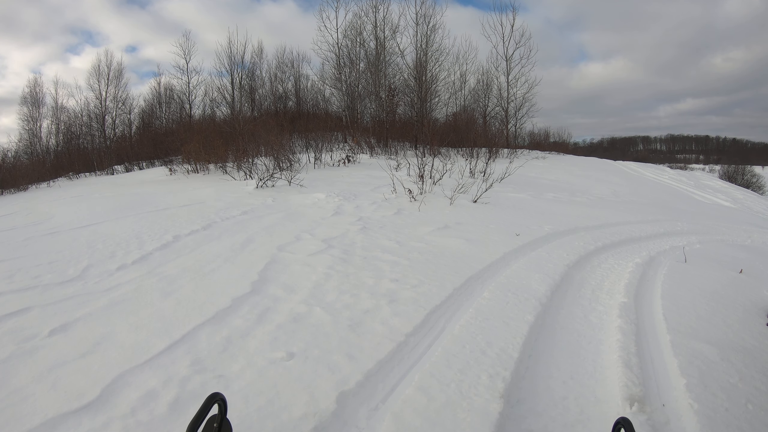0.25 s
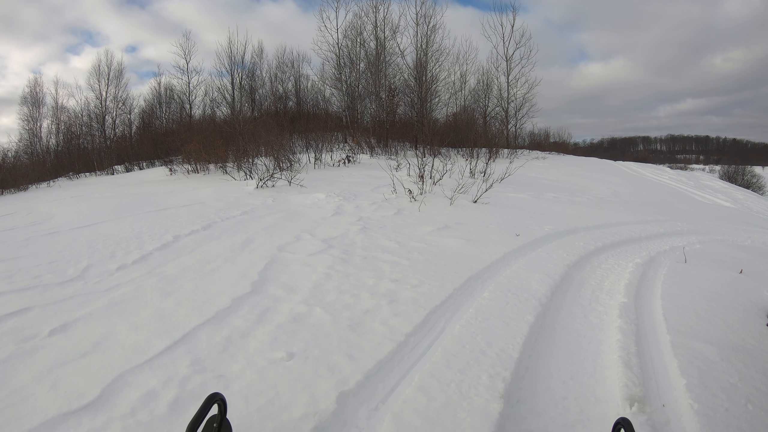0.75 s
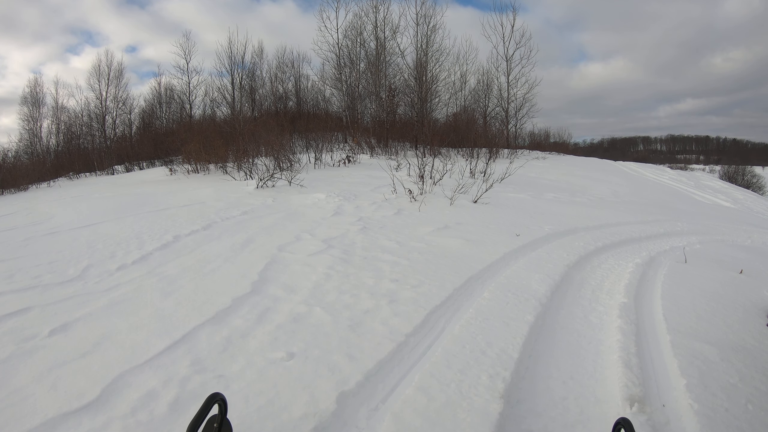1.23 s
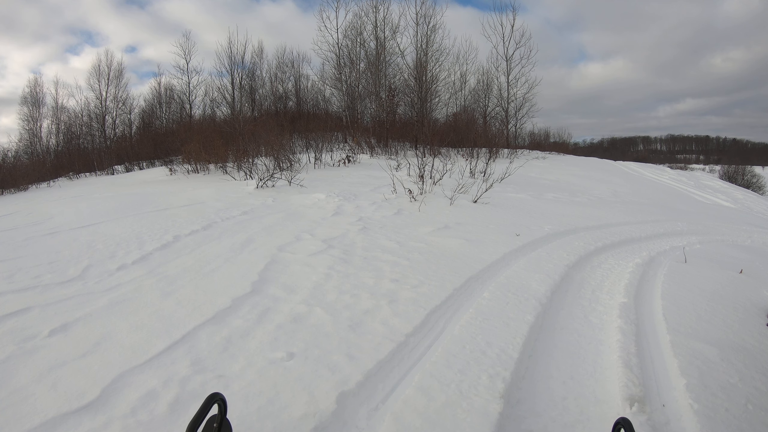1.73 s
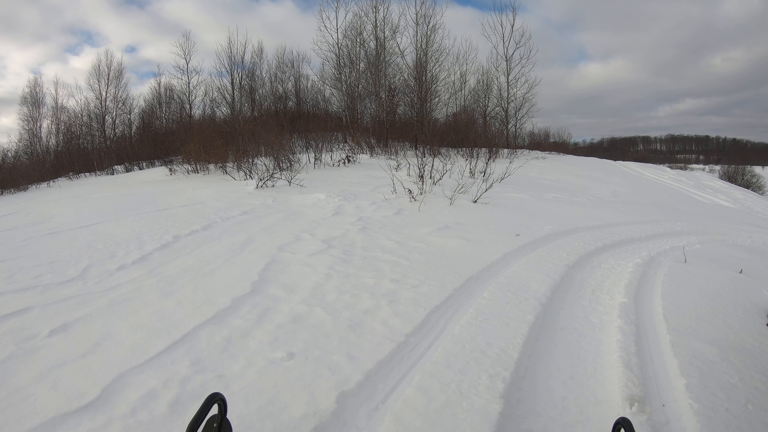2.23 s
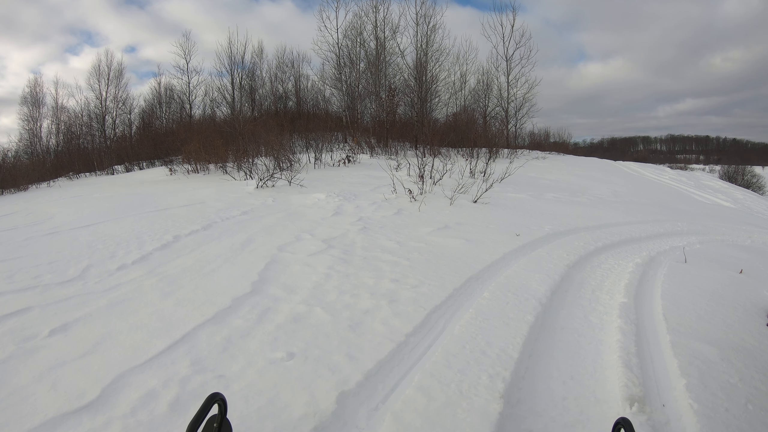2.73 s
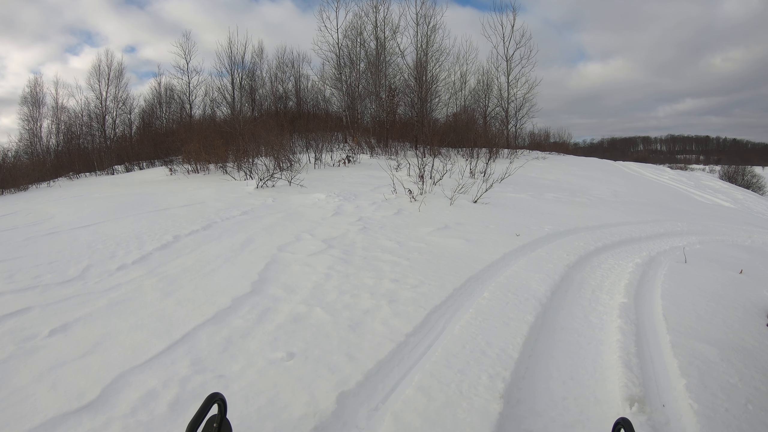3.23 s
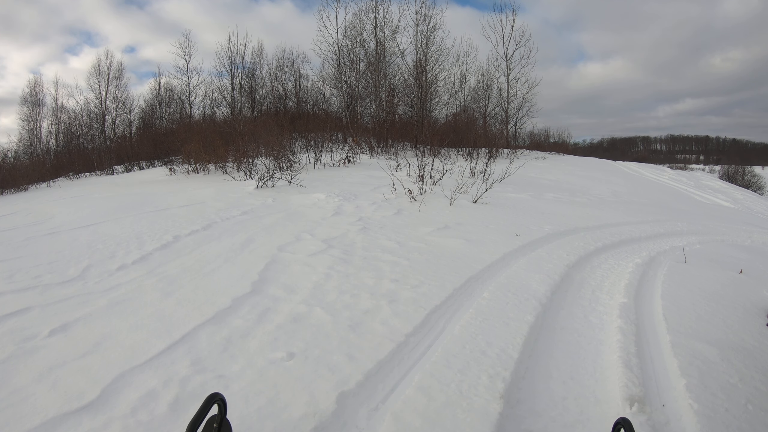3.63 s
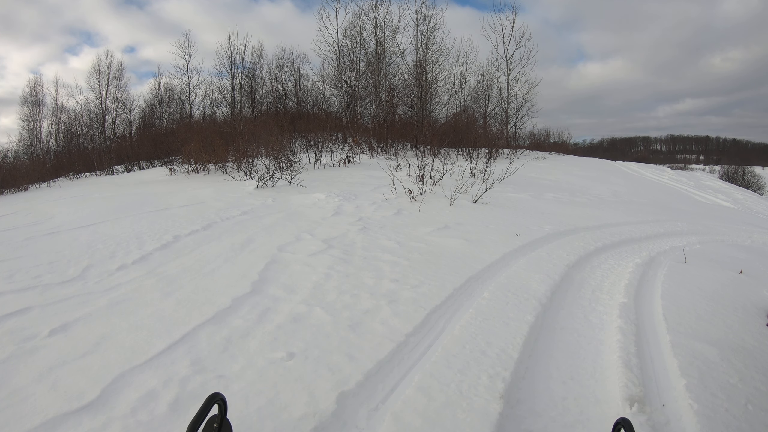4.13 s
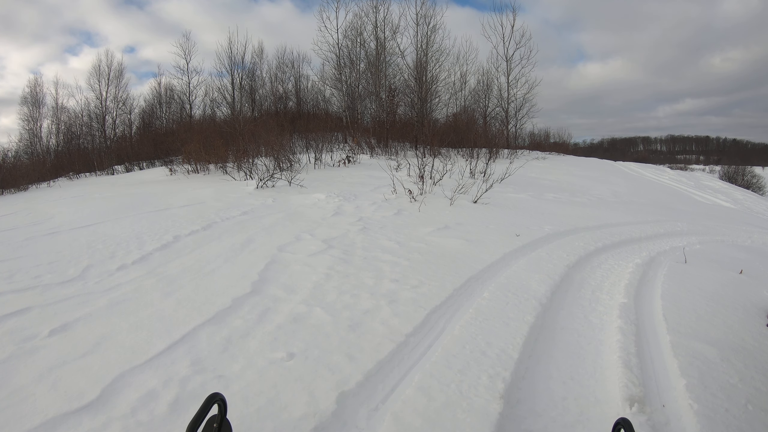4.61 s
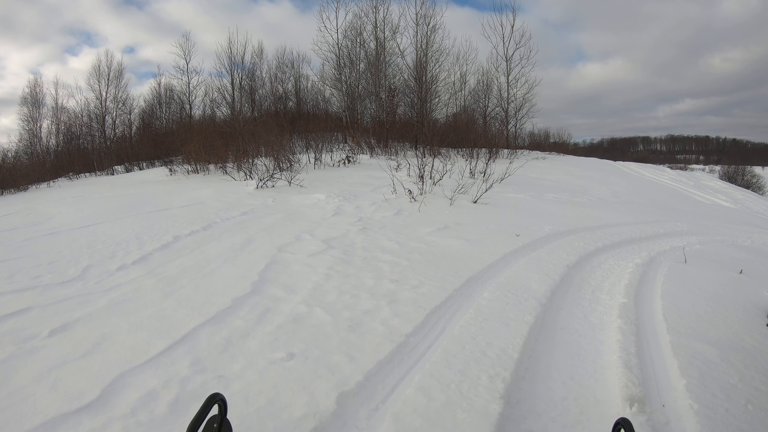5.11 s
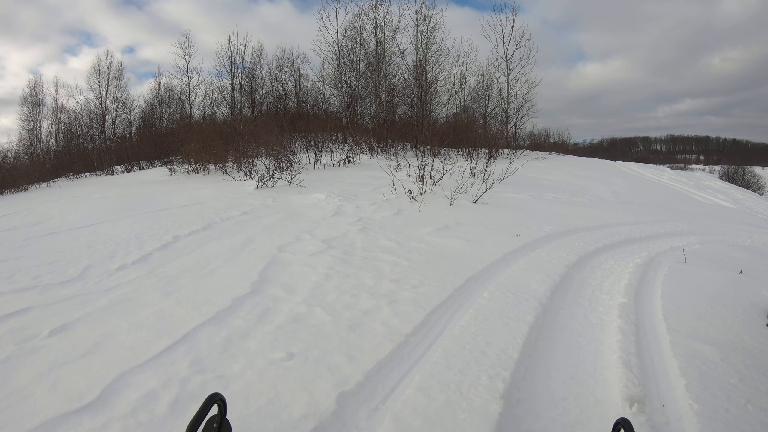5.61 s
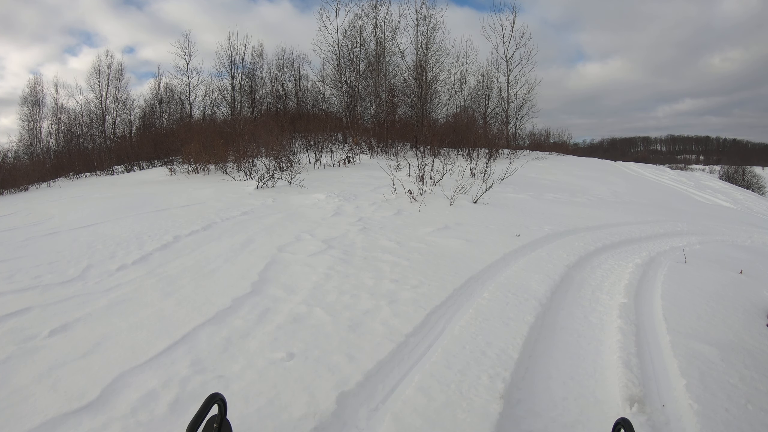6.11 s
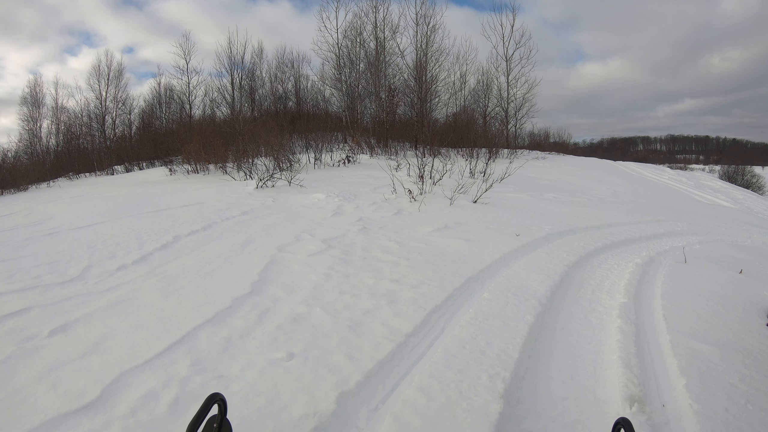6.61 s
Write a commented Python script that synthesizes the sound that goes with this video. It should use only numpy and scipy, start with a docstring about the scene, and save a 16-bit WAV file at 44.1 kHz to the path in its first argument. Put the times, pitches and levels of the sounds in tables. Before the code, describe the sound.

A two-stroke snowmobile engine idles steadily up close, a low fluttering putter with uneven thumps and constant loose metallic clanking and rattling outdoors.

```python
"""A two-stroke twin idles on a parked snowmobile in open snow, heard by a small camera's microphone on it.
Early in each crank turn a thin part ticks (noise bursts) and puffs ring the silencer (resonators); then
the first cylinder gulps (pressure dips), the second half a turn later. Uneven burns thump the pipe (resonators)
about .09 turn after each half-turn mark, and loose metal slaps, clanks and knocks (struck modes).
Gas roars all through (coloured noise swelling with the crank). The snow gives back no echo."""
import sys
import numpy as np
from scipy import signal
from scipy.fft import rfft, irfft
from scipy.io import wavfile
from scipy.ndimage import uniform_filter1d

SR = 44100
rng = np.random.default_rng(int(sys.argv[2]) if len(sys.argv) > 2 else 0)


def store_wav(level_fs):
    """Save 16-bit WAV to argv[1]."""
    pcm = np.round(np.clip(np.atleast_2d(level_fs), -1, 1) * 32767)
    wavfile.write(sys.argv[1], SR, pcm.T.astype(np.int16))


def natural_amplitude(level_db):
    """Convert a level in decibels to a linear amplitude factor, elementwise."""
    exponent = np.asarray(level_db, float) / 20
    return 10 ** exponent


N = 302570


def band(x, hz, width):
    """Two-pole resonance, gain 1 at the centre."""
    return signal.lfilter(*signal.iirpeak(hz, hz / width, fs=SR), x)


def level(x, db):
    """Scale to an rms level."""
    return x * natural_amplitude(db) / np.sqrt(np.mean(x ** 2))


def drift(hold):
    """Slow random wander: noise held for a number of samples, then smoothed over as many."""
    held = rng.standard_normal(N // hold + 1).repeat(hold)
    return uniform_filter1d(held, size=hold)[:N]


def blows(angle, at_turns, size):
    """One impulse of the given size where the crank (or the clock) passes each angle (or time)."""
    out = np.zeros(N + 1)
    np.add.at(out, np.searchsorted(angle, at_turns), size)
    out[0] = 0  # blows from before the start all land here
    return out[:N]


def bursts(impulses, fade_s):
    """Every impulse becomes a short fading burst of noise."""
    fade = signal.lfilter([1], [1, -np.exp(-1 / (fade_s * SR))], impulses)
    return fade * rng.standard_normal(N)


# idle speed hunts a little: (time [s], speed [crank turns/s])
IDLE_SPEED = [(0, 32.349), (.69, 32.459), (1.34, 32.897), (1.48, 32.355), (2.16, 33.023), (3.13, 32.666),
              (3.29, 32.314), (4.07, 33.292), (4.29, 32.541), (4.99, 32.407), (5.54, 33.099),
              (5.72, 32.634), (6.86, 31.766)]
START_ANGLE_TURNS = -.087
# the crank runs unevenly: scale of the wander before smoothing, and changes a second
UNEVEN_TURNS, UNEVEN_PER_S = .008, 16


def crank():
    """Crank angle in turns at every sample: the running sum of the speed, plus a random wander."""
    speed = np.interp(np.arange(N) / SR, *np.transpose(IDLE_SPEED))
    uneven = drift(int(SR / UNEVEN_PER_S))
    return START_ANGLE_TURNS + np.cumsum(speed) / SR + UNEVEN_TURNS * uneven


# pressure dips that follow each other in every half turn: (crank angle [turns], width [turns],
# depth [dB], second cylinder late by [turns], second cylinder deeper by [dB])
GULPS = [(0.2, 0.036, -4.7, 0, 0.3), (0.294, 0.038, -19, 0.0052, -2.5), (0.41, 0.028, -10.5, 0.016, 1.2)]
GULP_SCATTER_TURNS, GULP_SCATTER_DB = 0.0049, 1.0


def gulps(angle):
    """Smooth pressure dips, two sets a turn, each a little early or late and deep or shallow."""
    out = np.zeros(N)
    halves = int(2 * angle[-1]) + 2
    for at, width, db, late, second_db in GULPS:
        half = np.floor(2 * (angle - at) + .5)
        chance = rng.standard_normal((halves, 2))[np.clip(half, 0, None).astype(int)]
        second = half % 2
        centre = at + half / 2 + late * second + GULP_SCATTER_TURNS * chance[:, 0]
        depth = natural_amplitude(db + second_db * second + GULP_SCATTER_DB * chance[:, 1])
        out -= depth * np.exp(-.5 * ((angle - centre) / width) ** 2)
    return out - out.mean()


# resonances of the exhaust pipe: (frequency [Hz], width [Hz], rms level [dB])
PIPE = [(110.6, 49.7, -22), (265.5, 36, -37), (367.8, 43, -34)]
# the strongest burns: (time [s], strength before the mean is taken off [relative])
FULL_BURNS = [(.237, 1.6), (.453, 1.5), (.469, 2.0), (.577, 1.6), (1.007, 2.2), (1.053, 1.6), (1.19, 1.9),
              (1.573, 1.8), (1.681, 1.7), (1.956, 1.9), (2.898, 1.8), (3.235, 1.6), (3.359, 2.2),
              (3.405, 1.6), (3.421, 1.6), (3.62, 1.8), (3.727, 1.6), (3.818, 1.8), (3.863, 1.6),
              (3.999, 1.6), (4.241, 1.9), (4.333, 1.8), (4.348, 1.5), (4.425, 1.6), (4.579, 1.8),
              (4.918, 1.8), (4.933, 1.6), (5.042, 2.1), (5.348, 1.9), (5.424, 1.5), (5.651, 1.8),
              (5.712, 1.6), (5.804, 1.6), (5.865, 1.6), (5.881, 1.5), (6.376, 1.5), (6.516, 1.5)]
# strength of the usual weak burns before the mean is taken off: (lowest [relative], highest [relative])
WEAK_BURN_RANGE = (-1.4, 0.14)
BURN_ANGLE_TURNS, BURN_SCATTER_TURNS, SECOND_BURN_DB = .588, 0.0094, 0.5
FAIR_CHANCE_PER_TURN = .075


def burns(angle):
    """Burns above and below the mean strength thump the pipe, once for each cylinder and turn."""
    half = np.arange(-1, int(2 * angle[-1]) + 1)
    chance = rng.uniform(0, 1, (len(half), 3))
    low, high = WEAK_BURN_RANGE
    strength = low + (high - low) * chance[:, 0] ** 2
    full_s, full = np.transpose(FULL_BURNS)
    full_angle = angle[(full_s * SR).astype(int)]
    strength[np.round(2 * (full_angle - BURN_ANGLE_TURNS)).astype(int) + 1] = full
    # fresh charge gathers in a cylinder: a fair burn grows likelier with every turn since its last one
    fair_low, fair_high = .8, 1.4
    waited = [0, 0]  # turns, for each cylinder
    for k in range(len(half)):
        cylinder = k % 2
        if strength[k] < fair_low and chance[k, 2] < FAIR_CHANCE_PER_TURN * waited[cylinder]:
            strength[k] = fair_low + (fair_high - fair_low) * chance[k, 0]
        waited[cylinder] = 1 if strength[k] >= fair_low else waited[cylinder] + 1
    strength = (strength - strength.mean()) * natural_amplitude(SECOND_BURN_DB * (half % 2))
    at = BURN_ANGLE_TURNS + half / 2 + BURN_SCATTER_TURNS * chance[:, 1]
    push = blows(angle, at, strength)
    return sum(level(band(band(push, hz, width), hz, width), db) for hz, width, db in PIPE)


# how loosely the metal rattles: (time [s], level [dB])
LOOSENESS = [(0, -1), (.8, -0.5), (1.6, -1), (2.4, -2), (3.2, 0), (4.1, -3), (4.8, -2), (5.6, -3.5),
             (6.3, -3.5), (6.86, -1.5)]
# clanks and knocks placed by time, loud and soft: (time [s], blow level before the ringing [dB])
CLANKS = [(0.0553, -30), (0.0879, -21), (0.1204, -30), (0.149, -29), (0.162, -26.5), (0.182, -25.5),
          (0.2134, -27), (0.2738, -24), (0.315, -35), (0.3164, -30), (0.3351, -25), (0.3656, -22.5),
          (0.4584, -24.5), (0.4928, -23), (0.5227, -32), (0.5646, -31), (0.5843, -19), (0.6162, -25.5),
          (0.658, -28), (0.687, -30), (0.7066, -23), (0.734, -35), (0.777, -31), (0.7983, -26),
          (0.826, -27), (0.8579, -30), (0.8714, -33), (0.8919, -33), (0.9183, -31), (0.9328, -28),
          (0.963, -31), (0.982, -25), (1.016, -20), (1.045, -21), (1.0753, -24.5), (1.105, -28),
          (1.1333, -33), (1.1494, -32), (1.1687, -21), (1.1977, -32), (1.2092, -31), (1.2253, -23.5),
          (1.256, -31), (1.2905, -19), (1.3166, -25), (1.3807, -23), (1.4092, -29), (1.4401, -30),
          (1.4693, -25), (1.503, -27), (1.5425, -40), (1.56, -25), (1.5983, -17.5), (1.6268, -36),
          (1.6891, -20), (1.719, -27), (1.747, -31), (1.7609, -25), (1.7799, -21), (1.811, -23),
          (1.8402, -34), (1.8508, -32), (1.8811, -30), (1.881, -31), (1.901, -25), (1.933, -32),
          (1.9959, -21), (2.0335, -35), (2.0837, -24), (2.1478, -34), (2.176, -27), (2.236, -33),
          (2.2697, -19.5), (2.3042, -33), (2.3262, -31), (2.3372, -30), (2.357, -34), (2.4219, -23.5),
          (2.4499, -26), (2.4773, -29), (2.5064, -29), (2.541, -26), (2.5714, -36), (2.611, -29),
          (2.632, -24), (2.6643, -37), (2.7024, -34), (2.7247, -18.5), (2.7542, -25), (2.7931, -35),
          (2.813, -28), (2.845, -28), (2.873, -30), (2.8863, -31), (2.905, -23.5), (2.9387, -21),
          (2.9776, -37), (2.9941, -28), (3.027, -25), (3.057, -36), (3.0889, -35), (3.1178, -35),
          (3.13, -27.5), (3.1772, -35), (3.1921, -31), (3.2131, -20.5), (3.2405, -31), (3.269, -29),
          (3.3018, -31), (3.3134, -29), (3.3325, -28), (3.345, -26), (3.3648, -23.5), (3.3966, -25),
          (3.4381, -30), (3.457, -26), (3.486, -30), (3.5004, -27), (3.5205, -21.5), (3.552, -23.5),
          (3.5922, -39), (3.61, -30), (3.646, -26), (3.674, -32), (3.7135, -31), (3.7357, -19),
          (3.765, -31), (3.8062, -31), (3.8232, -23.5), (3.8561, -21.5), (3.8958, -23.5), (3.9527, -37),
          (3.984, -25), (4.0078, -24.5), (4.0978, -25), (4.1914, -38), (4.2213, -30), (4.3096, -45),
          (4.34, -24), (4.3692, -30), (4.4277, -33), (4.4618, -21), (4.5037, -25), (4.525, -24.5),
          (4.5677, -29), (4.587, -20), (4.658, -32), (4.6578, -31), (4.6805, -21), (4.7164, -30),
          (4.778, -31), (4.8, -26), (4.8314, -30), (4.8589, -36), (4.8725, -29), (4.8916, -25),
          (4.9236, -22.5), (4.9567, -27), (4.9955, -36), (5.013, -30), (5.0303, -26.5), (5.0484, -23.5),
          (5.0784, -32), (5.149, -33), (5.168, -25), (5.1804, -32), (5.202, -28), (5.243, -31),
          (5.2615, -28), (5.2939, -29.5), (5.3333, -30), (5.3532, -26), (5.3827, -31), (5.444, -29.5),
          (5.5368, -36), (5.6063, -34.5), (5.6286, -25), (5.657, -30), (5.685, -30), (5.7603, -32),
          (5.8114, -26.5), (5.8396, -28.5), (5.903, -31), (5.9743, -31), (5.9928, -22), (6.0676, -29),
          (6.097, -28), (6.1155, -25), (6.1585, -30), (6.1767, -26), (6.207, -31), (6.2228, -25.5),
          (6.2417, -28), (6.2827, -33), (6.3143, -26.5), (6.334, -31), (6.3627, -28), (6.3934, -31),
          (6.4375, -30.5), (6.4708, -30), (6.488, -27), (6.5178, -24.5), (6.549, -32), (6.564, -31),
          (6.581, -27), (6.6273, -27), (6.6418, -24.5), (6.675, -24.5), (6.708, -31), (6.7221, -28),
          (6.754, -27), (6.7835, -25), (6.8008, -23), (6.8334, -31), (6.8486, -26)]
# where in the turn the slap usually lands:
# (time [s], crank angle [turns], angle scatter [turns], level scatter [dB])
SLAP_ANGLE = [(0, 0.64, 0.056, -12), (1.2, 0.72, 0.043, 5), (2.6, .84, 0.063, -2), (3.6, 0.74, 0.043, 19),
              (4.8, 0.58, 0.075, -1), (5.601, .8, .035, 6), (6.101, 0.53, 0.018, 10),
              (6.86, 0.5, 0.023, 11)]
# blow level before looseness and scatter, its rise with lateness, and the ceiling after both
SLAP_DB, SLAP_DB_PER_TURN, SLAP_TOP_DB = -41.5, 18, -31.5


def slaps(angle):
    """Times and blow levels of the clanks, and of a slack part's slap (later is harder) away from them."""
    t = np.arange(N) / SR
    turn = np.arange(int(angle[-1]) + 1)
    chance = rng.standard_normal((len(turn), 2))
    at_s, *columns = np.transpose(SLAP_ANGLE)
    turn_s = np.interp(turn, angle, t)
    usual, scatter, scatter_db = (np.interp(turn_s, at_s, column) for column in columns)
    late = scatter * chance[:, 0]
    slap_s = np.interp(turn + usual + late, angle, t)
    loose_db = np.interp(slap_s, *np.transpose(LOOSENESS))
    slap_db = SLAP_DB + SLAP_DB_PER_TURN * late + scatter_db * chance[:, 1] + loose_db
    slap_db = np.minimum(slap_db, SLAP_TOP_DB)
    clank_s, clank_db = np.transpose(CLANKS)
    free = np.abs(slap_s[:, None] - clank_s).min(axis=1) > .009  # s, no clank this near
    return np.r_[clank_s, slap_s[free]], np.r_[clank_db, slap_db[free]]


# what the metal rings with: (frequency [Hz], width [Hz], level before the ringing gain [dB])
METAL = [(1640, 1050, -7.5), (2217, 25, -14), (2390, 100, -18), (2884, 274, -8), (3134, 149, -4),
         (3496, 615, -11), (4430, 366, -8.5), (5200, 1300, -34.5), (7370, 600, -25.5), (9500, 1500, -41.5),
         (12220, 470, -40)]
# softer knocks every turn, before looseness and ringing:
# (crank angle [turns], angle scatter [turns], level [dB], level scatter [dB])
RATTLE = [(.7, .06, -40, 4), (0.14, .02, -40, 4), (0.085, .008, -36, 3), (0.2, .012, -32.5, 3.5),
          (.5, 0.02, -43, 4)]
# the shiver dies down in the quiet half of the turn
SHIVER_DB, SHIVER_SWELL_DB, SHIVER_ANGLE_TURNS = -55, 2.2, -.02
BLOW_LATE_S = 0.001402  # from the listed time to the blow
# stronger blows have a faint rising noise before and a fading jangle after; levels relative to the blow
RISE_DB, RISE_S, RISE_HZ, RISE_WIDTH_HZ = -23, 0.003, 3135, 900
JANGLE_DB, BRIGHT_JANGLE_DB, JANGLE_FADE_S = -26, -27, 0.002
# a short tone at RISE_HZ rises just ahead of the stronger blows
TONE_DB, TONE_WIDTH_HZ = 2, 213
BRIGHT_FROM_HZ, HARD_BLOW_DB = 4000, -16
RINGING_GAIN_DB = 30.0


def only_strong(hits):
    """Keep the blows that stand well clear of the shiver."""
    return hits * (np.abs(hits) > 8 * natural_amplitude(SHIVER_DB))


def jangle(hits, db):
    """Blows, the stronger ones each followed by a fading burst of noise."""
    return hits + natural_amplitude(db) * bursts(only_strong(hits), JANGLE_FADE_S)


def metal(angle):
    """Clanks and slaps, the soft knocks of every turn and a shiver ring the same metal modes."""
    t = np.arange(N) / SR
    turn = np.arange(int(angle[-1]) + 1)
    shiver_db = SHIVER_DB + SHIVER_SWELL_DB * np.cos(2 * np.pi * (angle - SHIVER_ANGLE_TURNS))
    knocks = natural_amplitude(shiver_db) * rng.standard_normal(N)
    for at, scatter, db, scatter_db in RATTLE:
        chance = rng.standard_normal((len(turn), 2))
        size = natural_amplitude(db + scatter_db * chance[:, 1])
        knocks = knocks + blows(angle, turn + at + scatter * chance[:, 0], size)
    blow_s, blow_db = slaps(angle)
    clanks = blows(t, blow_s + BLOW_LATE_S, natural_amplitude(blow_db))
    hits = clanks + knocks * natural_amplitude(np.interp(t, *np.transpose(LOOSENESS)))
    # faint noise near 3.1 kHz rises for a few ms, then the sharp blow: the fades run backwards in time
    backward = only_strong(hits)[::-1]
    rising_noise = bursts(backward, RISE_S)[::-1]
    rise = natural_amplitude(RISE_DB) * band(rising_noise, RISE_HZ, RISE_WIDTH_HZ)
    rise = rise + natural_amplitude(TONE_DB) * band(backward, RISE_HZ, TONE_WIDTH_HZ)[::-1]
    # harder blows are shorter, so they reach the high modes more than soft ones do
    hard = hits * (np.abs(hits) / natural_amplitude(HARD_BLOW_DB)) ** 0.3
    dull = jangle(hits, JANGLE_DB) + rise
    bright = jangle(hard, BRIGHT_JANGLE_DB)
    out = 0
    for k, (hz, width, db) in enumerate(METAL):
        shove = dull if hz < BRIGHT_FROM_HZ else bright
        ring = band(band(band(shove, hz, width), hz, 2.34 * width), hz, 4 * width)
        out = out + (-1) ** k * natural_amplitude(db) * ring  # neighbours in opposite phase
    return natural_amplitude(RINGING_GAIN_DB) * out


# chambers of the silencer: (frequency [Hz], width [Hz], rms level before the trim [dB],
# crank angle of the puff [turns], angle scatter [turns])
SILENCER = [(331.4, 62.4, -30.5, .136, .005), (540, 90, -44, .13, .008), (550, 80, -37, .69, .008),
            (690, 34, -43.5, .12, .004), (860, 50, -44.5, .12, .004), (1016, 35, -52, .12, .004),
            (780, 200, -47, .47, .006), (780, 200, -48, .84, .006), (1600, 700, -48.5, .125, .006)]
SILENCER_TRIM_DB = -1.35
PUFFS_ALIKE, PUFF_SCATTER_DB = .9, 2.  # share of timing common to all chambers; spread of puff size


def silencer(angle):
    """Soft puffs of gas ring the chambers of the silencer, each once a turn."""
    turn = np.arange(-1, int(angle[-1]) + 1)
    chance = rng.standard_normal((len(turn), 2 * len(SILENCER)))
    shared = rng.standard_normal(len(turn))
    out = 0
    for k, (hz, width, db, at, scatter) in enumerate(SILENCER):
        own = np.sqrt(1 - PUFFS_ALIKE ** 2) * chance[:, 2 * k]
        late = scatter * (PUFFS_ALIKE * shared + own)
        push = blows(angle, turn + at + late, natural_amplitude(PUFF_SCATTER_DB * chance[:, 2 * k + 1]))
        out = out + level(band(band(push, hz, width), hz, 3 * width), db)
    return natural_amplitude(SILENCER_TRIM_DB) * out


def tick(angle):
    """A thin bright tick near the same angle of every turn: noise bursts through two resonances."""
    angle_turns, scatter_turns, db, scatter_db = .075, .006, -49, 2.7  # dB before the last gain
    hz, width_hz = 8860, 2200
    turn = np.arange(int(angle[-1]) + 1)
    chance = rng.standard_normal((len(turn), 2))
    size = natural_amplitude(db + scatter_db * chance[:, 1])
    hits = blows(angle, turn + angle_turns + scatter_turns * chance[:, 0], size)
    return band(band(bursts(hits, fade_s=0.0012), hz, width_hz), hz, width_hz) * natural_amplitude(9.5)


# colour of the gas roar: (frequency [Hz], relative density [dB per Hz])
ROAR = [(20, -21.5), (50, -17.5), (80, -11), (170, -12), (440, -16.5), (700, -20), (1140, -30.5),
        (1600, -30), (2400, -42.5), (4000, -45.5), (6300, -62.5), (9700, -57), (11000, -79.5), (15000, -91)]
# the roar swells with the crank: (from [Hz], to [Hz], swells [per turn], angle [turns], depth [dB])
ROAR_SWELL = [(20, 400, 2, 0.2, 3), (400, 650, 2, 0.23, 3), (650, 1200, 1, 0.25, 0.5),
              (1200, 2300, 1, 0.05, 1.5), (2300, 6000, 1, 0.0, 2), (6000, 16000, 1, 0.0, 1.5)]
ROAR_DB = -27.5
# the hiss of the gas is stronger in some turns than in others
HISS_FROM_HZ, HISS_SCATTER_DB = 1200, 1.8


def roar(angle):
    """Gas rush: coloured noise in bands, each swelling with the crank and flickering a little."""
    hz = np.maximum(np.fft.rfftfreq(N, 1 / SR), 1)
    points_hz, points_db = np.transpose(ROAR)
    colour = natural_amplitude(np.interp(np.log(hz), np.log(points_hz), points_db))
    turns = np.arange(int(angle[-1]) + 2)
    gust_db = HISS_SCATTER_DB * np.interp(angle, turns, rng.standard_normal(len(turns)))
    out = 0
    for lo_hz, hi_hz, swells, at, depth_db in ROAR_SWELL:
        inside = (hz >= lo_hz) * (hz < hi_hz)
        part = irfft(rfft(rng.standard_normal(N)) * colour * inside, N)
        swell_db = depth_db * np.cos(2 * np.pi * round(swells) * (angle - at))
        flicker_db = 0.25 * drift(400)
        out = out + part * natural_amplitude(swell_db + flicker_db + gust_db * (lo_hz >= HISS_FROM_HZ))
    return level(out, ROAR_DB)


def scene():
    """All parts of the engine at one close microphone, driven by one crank."""
    angle = crank()
    engine = gulps(angle) + burns(angle) + metal(angle) + silencer(angle)
    return (engine + tick(angle) + roar(angle))[None]


def band_limit(x):
    """A steep low-pass at the top of the band."""
    return signal.sosfilt(signal.butter(12, 15330, fs=SR, output="sos"), x)


def record(dry):
    """The microphone rounds the tallest peaks, drops the deepest bass and sits slightly off zero."""
    squeeze, bass_cut_hz, offset = .7, 7., .0035
    rounded = np.tanh(squeeze * dry) / squeeze
    bass_cut = signal.butter(1, bass_cut_hz, "high", fs=SR, output="sos")
    finished = signal.sosfilt(bass_cut, rounded) + offset
    return band_limit(finished)


dry = scene()
out = record(dry)
store_wav(out)
```